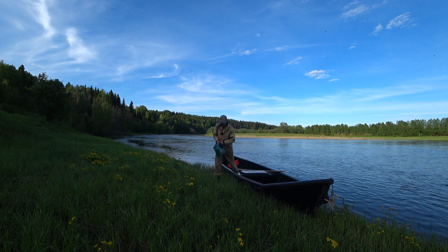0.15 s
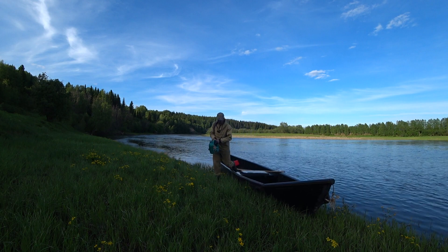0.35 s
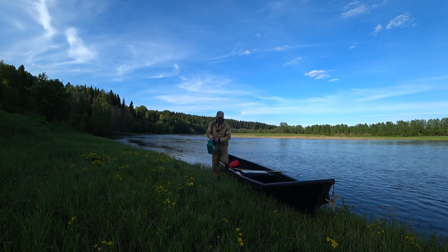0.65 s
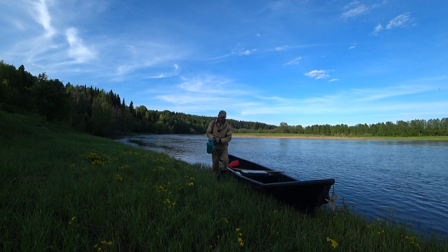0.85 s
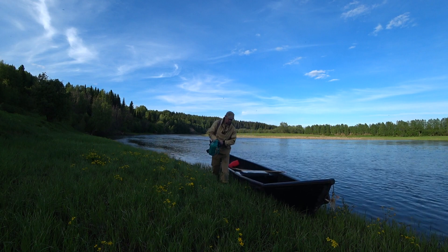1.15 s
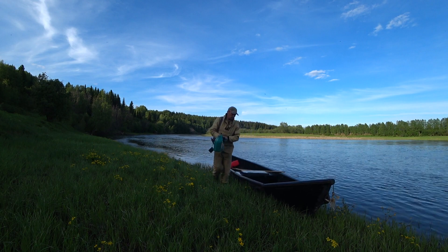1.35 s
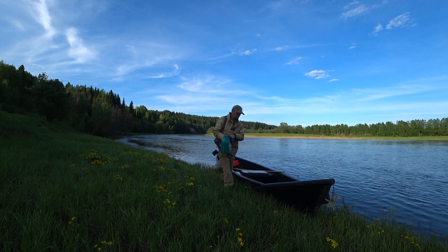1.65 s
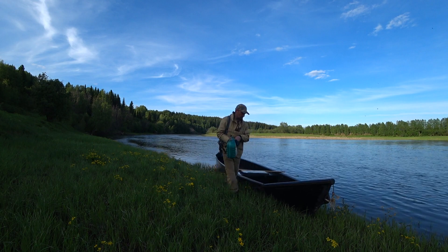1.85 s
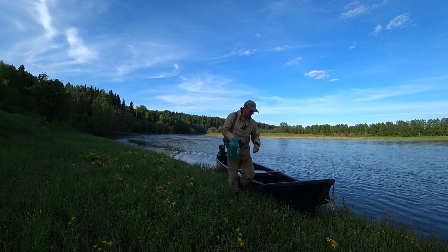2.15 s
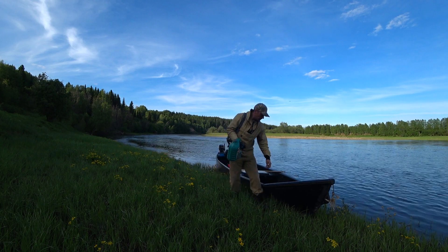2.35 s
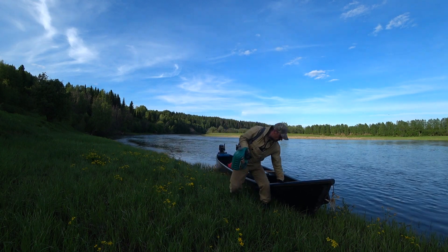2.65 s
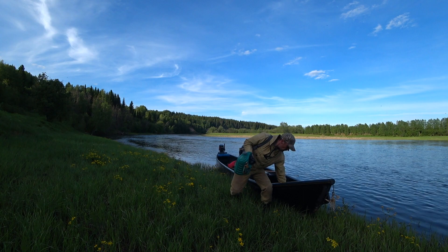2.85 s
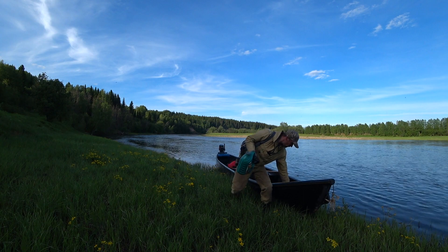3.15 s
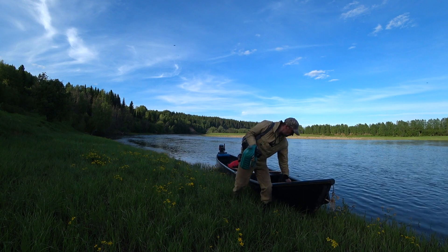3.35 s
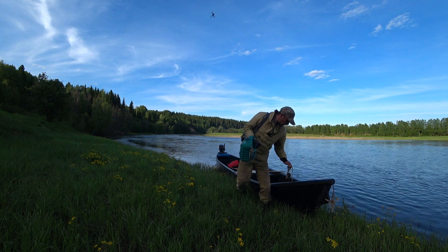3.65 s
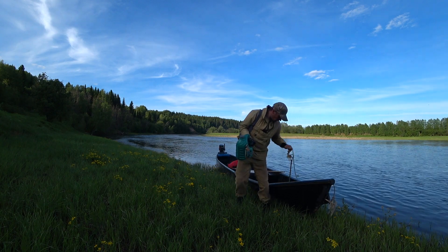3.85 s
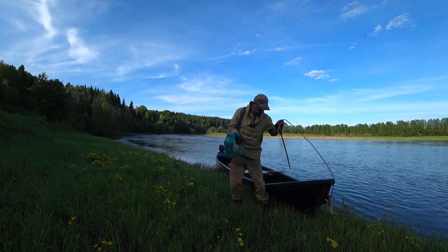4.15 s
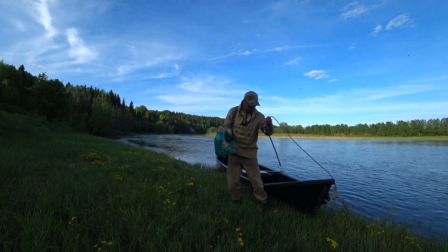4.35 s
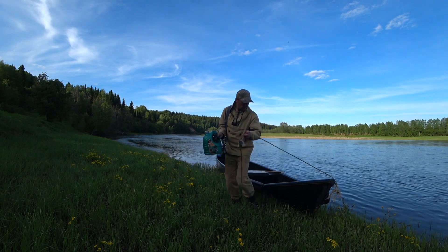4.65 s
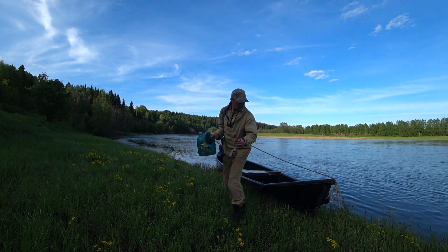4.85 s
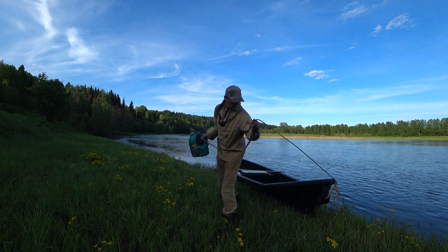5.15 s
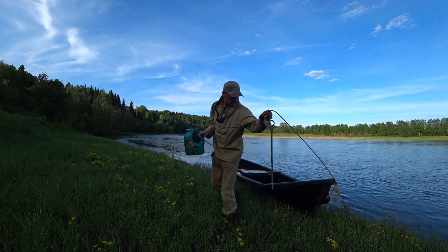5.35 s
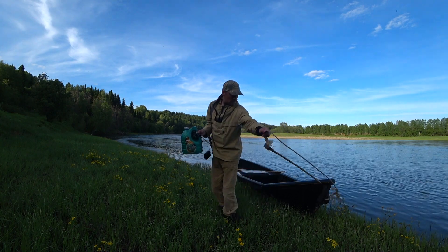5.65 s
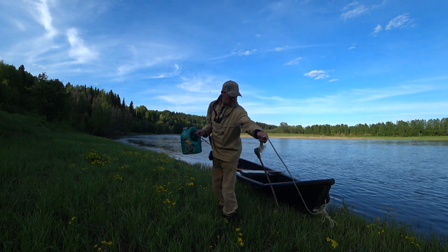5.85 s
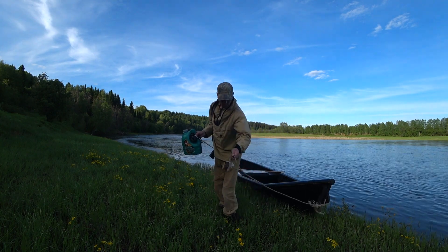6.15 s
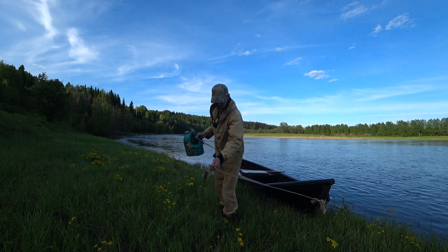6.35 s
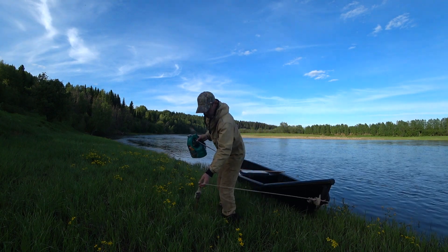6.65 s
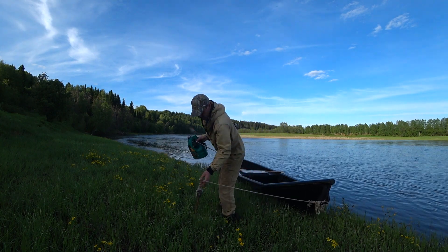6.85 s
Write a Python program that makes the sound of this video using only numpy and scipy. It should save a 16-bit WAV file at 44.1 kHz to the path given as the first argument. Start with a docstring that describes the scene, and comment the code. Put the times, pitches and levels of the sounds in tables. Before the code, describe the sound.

On a riverbank, a soft steady rush of water lies under close sounds of someone leaving a plastic boat. A deep hollow thud comes first, then light bumps, rustling cloth and snapping stalks. Midway, gear knocks, rattles and scrapes against the hull, and after the hardest blow a rope briefly zips over the edge. Clothes and grass keep swishing, then thin out. Far birds and a high insect are barely audible.

```python
"""Stepping ashore from a plastic boat

A boot booms in the hollow hull; gear at the bow knocks, judders and scrapes, driving the shell's modes.
A mooring rope buzzes over the rim. Clothes and long grass swish and snap with each stride on the bank.
Behind: the soft rush of the river, far birds, one insect."""
import sys
import numpy as np
from scipy import signal
from scipy.fft import rfft, irfft, next_fast_len
from scipy.io import wavfile
from scipy.ndimage import map_coordinates

SR = 44100
rng = np.random.default_rng(int(sys.argv[2]) if len(sys.argv) > 2 else 0)


def log_audio(samples):
    """Write samples as a 16-bit WAV file to the path given in sys.argv[1]."""
    # one column per channel
    frames = np.atleast_2d(samples).T
    # limit to full scale, then quantise
    limited = np.clip(frames, -1, 1)
    pcm = np.round(limited * 32767).astype(np.int16)
    wavfile.write(sys.argv[1], SR, pcm)


N = 308700

# river spectrum: f/Hz, level/dB
RIVER_SPECTRUM = [(12, -23), (20, -2), (101, -6.5), (172, -8), (317, -8), (419, -10.5), (1080, -14.5),
                  (2800, -21), (3310, -19.5), (4760, -22), (10400, -27.5), (15800, -30.5)]
# river stereo width: f/Hz, side over mid/dB
RIVER_WIDTH = [(60, -13), (110, -5.5), (200, -2), (380, 2.5), (700, 6), (1290, 7), (2380, 6), (4400, -1.5),
               (8120, -0.5), (15000, -4.5)]
# far birds: start t/s, end t/s, start f/Hz, end f/Hz, width/Hz, level/dB
BIRD_CALLS = [(-.1, 0.268, 795, 792, 44.6, -57.5), (-.03, .19, 5040, 4450, 150, -67),
              (.252, 0.957, 3060, 3200, 139, -63.5), (2.704, 3.155, 4070, 4010, 150, -63),
              (2.87, 3.214, 3380, 3310, 350, -61.5)]
# insect chirrs: t/s, level/dB
CHIRRS = [(0, -67), (2.889, -67), (3.503, -70), (5.75, -68.5), (6.72, -71)]

# blows on the hull: t/s, level/dB, contact corner/Hz, bass/dB, place/0-1, panel f/Hz, panel level/dB
KNOCKS = [(.255, -38.5, 910, 5.5, 0.32, 187, -3), (.567, -7, 150, 10, 0.2, 199, -12),
          (.675, -22, 150, 6, .1, 131, -3), (.728, -21, 130, 14, 0.24, 117, -20),
          (1.095, -30, 400, 10, 0.31, 151, -8.5), (1.239, -19.5, 1300, -14, 0.68, 186, -2),
          (1.399, -29, 2200, -28, 1, 161, -2), (1.721, -35, 300, -4.5, 0, 170, -1.5),
          (3.157, -23, 4500, -18, 0.84, 1800, -13), (3.177, -6, 4760, -7, .57, 1190, -19),
          (3.206, -12, 3200, -14, 0.53, 2560, -17), (3.483, -20, 500, 9.5, 1, 294, -13),
          (3.543, -2, 1200, -3, 0.42, 1250, -12), (3.624, -22, 1800, -3, .77, 1330, -4),
          (3.928, 0.5, 4200, 0, .3, 680, -2.5), (3.932, -10.5, 348, 2, 0.26, 277, -1.5),
          (3.974, -20, 350, -5, 0.54, 105, -2), (4.29, -26, 900, -5, 0.23, 218, -20),
          (4.593, -28.5, 490, 0, 0.36, 196.3, -10.5), (5.242, -18, 1300, -10, 0.71, 174, -9.5)]
# bouncing contacts: t/s, gap/s, loss per contact/dB, then as KNOCKS from level on
JUDDERS = [(.587, .0205, 3, -10.5, 118, 8, 0.31, 150, -5.5),
           (3.191, 0.027, 6.9, -6.5, 600, -9, 0.4, 297, -4.5),
           (3.388, .022, 5.1, -18.5, 910, 1, 1, 287, -2), (3.558, .015, 8.5, -16, 740, -18, .3, 550, 5)]
# shell modes: f/Hz, level/dB, t60/s
HULL_MODES = [(71, -39, .5), (98.5, -26, 0.35), (122.2, -26, 0.5), (148.4, -29, 0.32), (160.3, -31.5, 0.66),
              (209.5, -25, 0.29), (237.8, -19.5, 0.19), (278.1, -18, 0.19), (301, -18.5, 0.17),
              (351.6, -19, 0.15), (392, -19.5, 0.15), (476, -18.5, 0.058), (534, -17.5, 0.075),
              (597, -15.5, 0.084), (672, -22, 0.09), (711.5, -19, 0.088), (830, -29, 0.066),
              (1052, -23, 0.083), (1140, -20.5, 0.066), (1296, -18, 0.04), (1480, -24, 0.044),
              (1765, -21, 0.043), (1900, -30, 0.1), (2360, -28.5, 0.055), (2594, -27.5, 0.058),
              (2700, -25, 0.034), (3610, -24, 0.02), (4640, -19.5, 0.023)]
# dense weak modes: f/Hz, level/dB
DENSE_SPECTRUM = [(60, -0.5), (130, 13), (300, 1.5), (460, -5), (680, 3), (930, -4.5), (1150, -4.5),
                  (1550, -9.5), (2500, -15), (4000, -6.5), (5500, -7.5), (8000, -24), (16000, -41)]
# their decay: f/Hz, t60/s
DENSE_T60 = [(100, 0.32), (300, 0.42), (800, 0.28), (2000, 0.082), (5000, 0.065), (12000, 0.016)]
# near sources: f/Hz, left-right correlation
NEAR_CORRELATION = [(200, 1), (1000, 0.8), (2000, 1), (4500, 0.94), (14000, 0.94)]
# bank echo: f/Hz, level/dB
ECHO_SPECTRUM = [(100, 0), (1500, -7), (4000, 22), (10000, -5)]
# bank echo: f/Hz, left-right correlation
ECHO_CORRELATION = [(100, 1), (1000, 0.3)]

# cloth and grass sliding: t/s, rise/s, hold/s, fall/s, level/dB, left over right/dB
SWISHES = [(0.74, .13, 0.0099, .06, -52.5, 5), (0.827, 0.14, .04, 0.23, -63, 8),
           (1.031, .16, 0.096, .03, -44.5, 2.5), (1.454, 0.48, 0.019, 0.26, -45.5, 4.5),
           (1.665, 0.36, 0.047, 0.18, -39.5, 2), (1.837, 0.088, 0.034, 0.12, -43.5, 2.5),
           (2.043, 0.028, 0.036, 0.52, -49.5, 3), (2.235, 0.16, .015, 0.089, -47, 2),
           (2.337, 0.051, 0.058, 0.24, -44.5, 1), (2.402, 0.13, .18, .17, -41, 1.5),
           (3.492, 0.061, .005, .05, -50, 4.5), (3.68, .8, 0.49, 0.5, -55, 4.5),
           (3.964, 0.26, 0.041, 0.039, -40, 2), (4.537, 0.32, 0.11, .2, -53, 2.5),
           (4.802, 0.17, 0.27, 0.17, -41, 2.5), (5.23, .02, 0.0034, 0.076, -50, 5),
           (5.317, 0.083, 0.37, 0.25, -56, 4), (5.576, 0.21, 0.053, 0.036, -44, 3),
           (6.317, 0.057, 0.18, 0.094, -61, 5), (6.725, .04, 0.011, 0.049, -53, 4)]
# sliding hiss: f/Hz, level/dB
SWISH_SPECTRUM = [(880, -9.5), (1500, -10.5), (2600, -7.5), (2930, -7), (3940, -2.5), (4940, -1),
                  (7850, -4), (8580, -9.5), (10700, -7.5), (13000, -11.5), (15800, -19)]
# heavy cloth bunching: t/s, rise/s, hold/s, fall/s, level/dB
CRUMPLES = [(0.305, 0.11, 0.034, .08, -53.5), (.6, 2.5, 0.24, 0.44, -54), (1.064, 0.22, 0.039, .15, -48),
            (1.36, 0.78, 0.11, 0.44, -50), (1.862, 0.2, 0.015, 0.52, -43.5), (2.6, .6, .05, 1.15, -52.5),
            (4.03, 0.27, 0.13, 1.2, -48.5), (5.095, 0.49, 0.018, 0.6, -46),
            (5.613, 0.059, 0.023, 0.052, -41.5)]
# jacket folds: f/Hz, level/dB
FOLD_SPECTRUM = [(80, -5), (180, 2), (400, -1), (900, -2.5), (1600, -2), (2800, -8.5), (4500, -4.5),
                 (9000, -19)]
# stalks, buckles, rope: t/s, level/dB, f/Hz
SNAPS = [(.4918, -42.5, 3840), (0.5683, -34.5, 1560), (.7243, -30, 4900), (0.8257, -33, 3300),
         (0.9505, -40, 1590), (1.239, -28, 2300), (1.3157, -29, 5500), (1.3244, -28, 5680),
         (1.3528, -26, 5360), (1.4, -34, 1680), (1.862, -31, 3500), (1.8708, -28, 3430), (1.884, -28, 3300),
         (2.0357, -35.5, 5030), (3.5423, -26, 1850), (4.2767, -28.5, 3590), (4.3557, -30.5, 2840),
         (5.771, -42, 1560), (6.9406, -41, 6660)]
# snap before its band filter: f/Hz, level/dB
SNAP_SPECTRUM = [(300, -0.21), (16000, -1.8)]

# gear shoved along the floor, then the rope sliding over the hull: t/s, rise/s, hold/s, fall/s, level/dB
SHOVES = [(3.186, 0.061, 0.073, 0.16, -38), (3.376, 0.13, 0.088, 0.2, -38.5), (3.612, .1, .01, .13, -45.5),
          (4.188, 0.32, 0.11, 0.18, -53)]
# slip force and surface scratch: f/Hz, level/dB
SLIP_SPECTRUM = [(80, 24), (300, 20.5), (5000, 4.4)]
SCRATCH_SPECTRUM = [(300, 7), (1500, 12.5), (3000, 7.5), (5500, 9), (9000, -19)]
# rope over the rim: t/s, strand rate/Hz, level/dB
ROPE_PULL = [(4.04, 2610, -65), (4.09, 2950, -48), (4.13, 3280, -49), (4.21, 3500, -61), (4.26, 3460, -73)]


def amp(db):
    """Decibels to gain."""
    return 10 ** (np.asarray(db) / 20)


def unit_rms(x):
    """Scale to rms 1."""
    return x / np.sqrt(np.mean(x ** 2) + 1e-20)


def at_hz(points, hz):
    """Interpolate (f, value) points on a log axis."""
    f, value = np.transpose(points)
    return np.interp(np.log(hz + 1), np.log(f + 1), value)


def wobble(rate_hz):
    """Smooth random curve, knots at rate_hz."""
    knots = rng.standard_normal(int(N * rate_hz / SR) + 4)
    return map_coordinates(knots, [np.arange(N) * rate_hz / SR])


def grain(rate_hz, depth_db):
    """Spiky gain, rms 1: surfaces catch and let go."""
    return unit_rms(amp(depth_db * np.clip(wobble(rate_hz), -2, 2)))


def filtered(x, response):
    """Apply a frequency response by FFT."""
    n = x.shape[-1]
    padded = next_fast_len(n + 8192)
    return irfft(rfft(x, padded) * response(np.fft.rfftfreq(padded, 1 / SR)), padded)[..., :n]


def pan(left_db):
    """Channel gains for a left-right difference."""
    return amp(np.array([[0.5], [-0.5]]) * left_db)


def add(track, at_s, sound):
    """Mix a sound in at at_s."""
    part = track[:, max(round(at_s * SR), 0):][:, :sound.shape[-1]]
    part += sound[..., :part.shape[-1]]


def noise(spectrum, correlation=NEAR_CORRELATION, size=N):
    """Shaped stereo noise, rms 1."""
    def shape(hz):
        angle = np.arccos(np.clip(at_hz(correlation, hz), -1, 1)) / 2
        return amp(at_hz(spectrum, hz)) * np.array([np.cos(angle), np.sin(angle)])
    mid, side = filtered(rng.standard_normal((2, size)), shape)
    return unit_rms(np.array([mid + side, mid - side]))


def stroke(at_s, rise_s, hold_s, fall_s, db, ramp_db=20):
    """Gain of one movement: up ramp_db per rise_s, held from at_s, down ramp_db per fall_s."""
    t = np.arange(N) / SR
    ramps = np.maximum(at_s - t, 0) / rise_s + np.maximum(t - at_s - hold_s, 0) / fall_s
    return amp(db - ramp_db * np.minimum(ramps, 10))


def power_sum(gains):
    """Unrelated noises add in power."""
    return np.sqrt(sum(g ** 2 for g in gains))


def river(level_db=-50, drift_db=0.03):
    """Moving water and light air: a wide, near-steady rush."""
    mid, side = filtered(rng.standard_normal((2, N)), lambda hz: amp(at_hz(RIVER_SPECTRUM, hz)))
    side = filtered(side, lambda hz: amp(at_hz(RIVER_WIDTH, hz)))
    return amp(level_db - drift_db * wobble(4)) * unit_rms(np.array([mid + side, mid - side]))


def far_call(start_s, end_s, start_hz, end_hz, width_hz, db):
    """Distance smears a call into a narrow noise band."""
    progress = np.clip((np.arange(N) / SR - start_s) / (end_s - start_s), 0, 1)
    phase = 2 * np.pi * np.cumsum(start_hz + (end_hz - start_hz) * progress) / SR
    smear = filtered(rng.standard_normal((2, N)), lambda hz: 1 / (1 + (2 * hz / width_hz) ** 4))
    arch = np.sqrt(8 * progress * (1 - progress))
    return amp(db) * arch * unit_rms(smear) * np.sin(phase)


def birds():
    """Soft, far whistles."""
    return sum(far_call(*call) for call in BIRD_CALLS)


def insect(length_s=0.32, pitch_hz=10280, width_hz=600):
    """One high chirr, repeated in the grass."""
    return sum(far_call(at_s, at_s + length_s, pitch_hz, pitch_hz, width_hz, db) for at_s, db in CHIRRS)


def contact(hz, corner_hz, bass_db, shelf_hz=200):
    """Blow spectrum: a soft one lacks treble, a heavy one moves the whole shell."""
    return amp(bass_db / (1 + (hz / shelf_hz) ** 4)) / np.sqrt(1 + (hz / corner_hz) ** 4)


def shell_ring(t, corner_hz, bass_db, place, node_db=3.5, travel_s=0.002, scatter_db=3.5, spread_db=1.5):
    """Hull modes after a blow, weighted by the place struck."""
    hz, db, t60_s = np.transpose(HULL_MODES)[:, :, None]
    wavenumber = np.sqrt(hz / hz[0])
    age_s = np.maximum(t - travel_s / wavenumber, 0)  # low bending waves travel slowest
    level_db = db + node_db * np.cos(2 * np.pi * wavenumber * place)
    level_db += scatter_db * rng.standard_normal(hz.shape)
    attack = 1 - np.exp(-2 * age_s * hz)
    modes = attack * amp(level_db - 60 * age_s / t60_s) * np.sin(2 * np.pi * hz * age_s)
    sides = pan(spread_db * rng.standard_normal(len(hz)) * wavenumber[:, 0] / wavenumber.mean())
    return sides @ (contact(hz, corner_hz, bass_db) * modes)


def dense_ring(t, corner_hz, bass_db):
    """Countless weak modes: noise whose treble dies first."""
    hz, age_s, bins = signal.stft(noise(DENSE_SPECTRUM, size=len(t)), SR, nperseg=256)
    fade = amp(-60 * age_s / at_hz(DENSE_T60, hz)[:, None])
    tail = signal.istft(bins * fade, SR, nperseg=256)[1][:, :len(t)]
    return filtered(tail, lambda f: contact(f, corner_hz, bass_db))


def panel_ring(t, hz, t60_cycles=15):
    """The struck panel swings for a few damped cycles."""
    cycles = hz * t
    return np.sin(2 * np.pi * cycles) * amp(-60 * cycles / t60_cycles) * (1 - np.exp(-cycles))


def blow(db, corner_hz, bass_db, place, panel_hz, panel_db):
    """One contact rings shell and panel."""
    t = np.arange(SR * 2 // 3) / SR
    shell = amp(1.5) * shell_ring(t, corner_hz, bass_db, place)
    dense = amp(-22) * dense_ring(t, corner_hz, bass_db)
    panel = amp(panel_db + 4) * panel_ring(t, panel_hz)
    return amp(db) * (shell + dense + panel)


def knocks(judder_contacts=3):
    """Boots and gear strike the hull, once or in a weakening run."""
    out = np.zeros((2, N))
    for at_s, *touch in KNOCKS:
        add(out, at_s, blow(*touch))
    for at_s, gap_s, loss_db, db, *touch in JUDDERS:
        for k in range(judder_contacts):
            add(out, at_s + k * gap_s, blow(db - k * loss_db, *touch))
    return out


def bass_cut(x, cut_hz=68):
    """A high-pass takes out the deepest bass."""
    return signal.sosfilt(signal.butter(4, cut_hz, "highpass", fs=SR, output="sos"), x)


def bank_echo(x, t60_s=1.6, wet_db=-32):
    """The wooded bank scatters a faint tail."""
    t = np.arange(SR) / SR
    tail = noise(ECHO_SPECTRUM, ECHO_CORRELATION, size=SR) * amp(-60 * t / t60_s)
    return amp(wet_db) * signal.fftconvolve(x, tail / np.linalg.norm(tail[0]), axes=1)[:, :N]


def crackle(rate_hz=70, spread_db=5):
    """Single blades and creases tick, random in time and size."""
    onsets = rng.random(N) < rate_hz / SR
    impulses = onsets * amp(spread_db * np.clip(rng.standard_normal(N), -2, 2))
    size = SR // 250
    tick = noise(SWISH_SPECTRUM, size=size) * np.exp(-np.linspace(0, 4, size))
    ticks = signal.fftconvolve(impulses[None], tick, axes=1)[:, :N]
    return unit_rms(ticks) * grain(2000, depth_db=-3)


def rustle(swish_db=2, fold_db=-1, crackle_db=-12, tug_db=-12):
    """Cloth and grass slide with a grainy hiss; jacket folds crumple lower, tugged by each slide."""
    slide = power_sum(stroke(*move) * pan(left_db) for *move, left_db in SWISHES)
    hiss = noise(SWISH_SPECTRUM) * grain(900, depth_db=0.66) * grain(60, depth_db=1.47)
    swish = amp(swish_db) * slide * (hiss + amp(crackle_db) * crackle())
    bunching = power_sum([amp(tug_db) * slide.mean(0)] + [stroke(*move) for move in CRUMPLES])
    folds = noise(FOLD_SPECTRUM) * grain(140, depth_db=3)
    return swish + amp(fold_db) * bunching * folds


def snaps(gain_db=-5, t60_s=0.026, half_width_oct=0.55):
    """Stalks, buckles and rope snap: short bursts, each around its own pitch."""
    out = np.zeros((2, N))
    t = np.arange(SR // 10) / SR
    for at_s, db, pitch_hz in SNAPS:
        band = lambda hz: 1 / (1 + (np.log2((hz + 1) / pitch_hz) / half_width_oct) ** 2)
        burst = unit_rms(filtered(noise(SNAP_SPECTRUM, size=len(t)), band))
        add(out, at_s, amp(db + gain_db - 60 * t / t60_s) * burst)
    return out


def gear_scrape(width_hz=40, scratch_db=-8):
    """Gear, then the rope, slips unevenly over the hull, driving its modes; a thin scratch on top."""
    def shell(f):
        damping = 1j * f * width_hz
        return sum(amp(db) * damping / (hz * hz - f * f + damping) for hz, db, _ in HULL_MODES)
    slips = grain(250, depth_db=2.5) * noise(SLIP_SPECTRUM)
    scratch = amp(scratch_db) * noise(SCRATCH_SPECTRUM)
    force = power_sum(stroke(*shove) for shove in SHOVES)
    return force * (unit_rms(filtered(slips, shell)) + scratch)


def rope(jitter=0.06):
    """The braid buzzes over the rim, rising as the pull speeds up."""
    t = np.arange(N) / SR
    at_s, rate_hz, db = np.transpose(ROPE_PULL)
    buzz_hz = np.interp(t, at_s, rate_hz) * (1 + jitter * wobble(1500))
    phase = 2 * np.pi * np.cumsum(buzz_hz) / SR
    return amp(np.interp(t, at_s, db)) * np.sin(phase) * grain(200, depth_db=4.5)


def scene():
    """Boat slightly right, swishes to the left, river all round."""
    boat = bass_cut(knocks() + gear_scrape()) * pan(left_db=-1.4)
    return river() + birds() + insect() + boat + bank_echo(boat) + rustle() + snaps() + rope()


def record(dry, top_hz=15850):
    """Brick-wall low-pass."""
    return filtered(dry, lambda hz: hz < top_hz)


dry = scene()
out = record(dry)
log_audio(out)
```